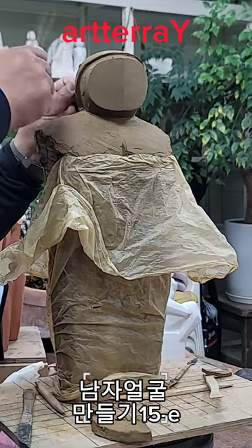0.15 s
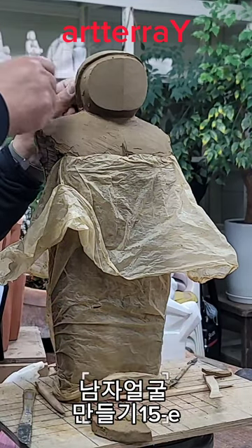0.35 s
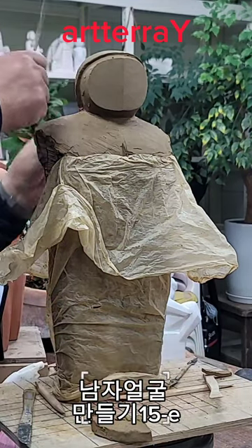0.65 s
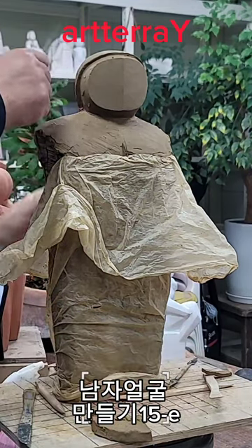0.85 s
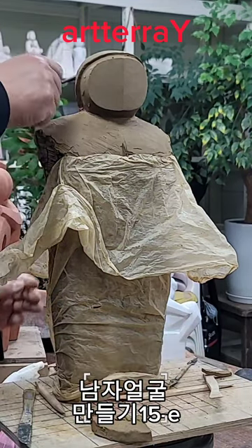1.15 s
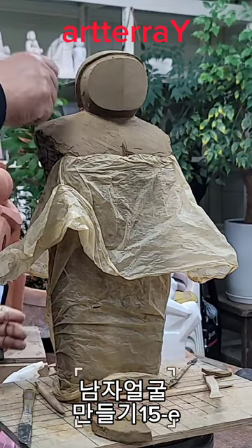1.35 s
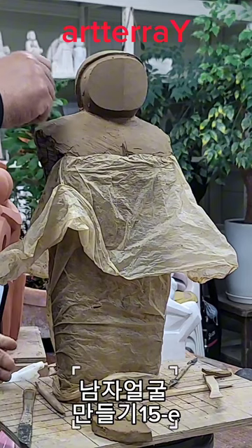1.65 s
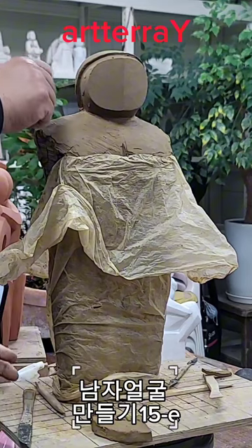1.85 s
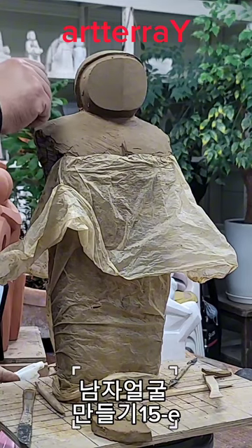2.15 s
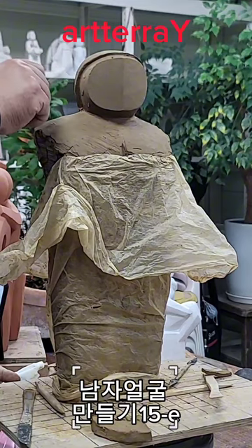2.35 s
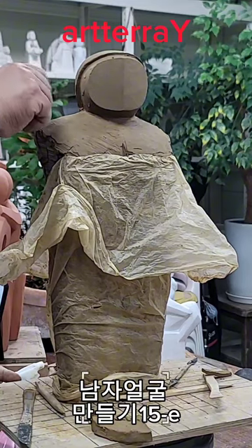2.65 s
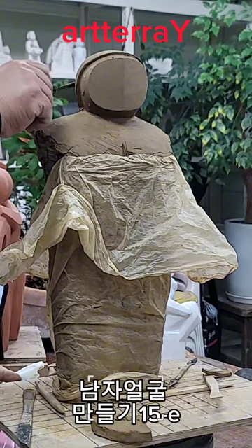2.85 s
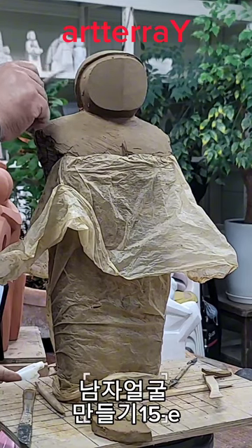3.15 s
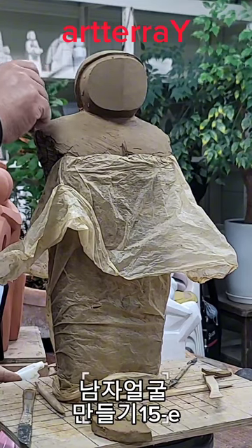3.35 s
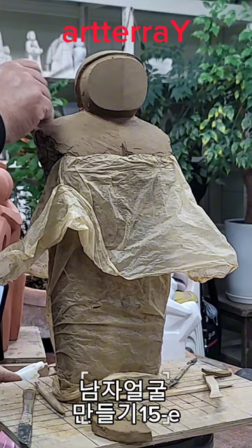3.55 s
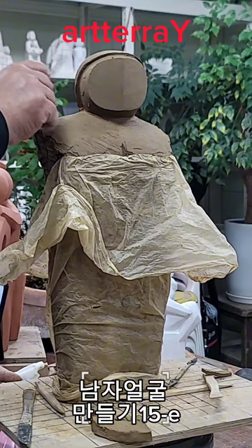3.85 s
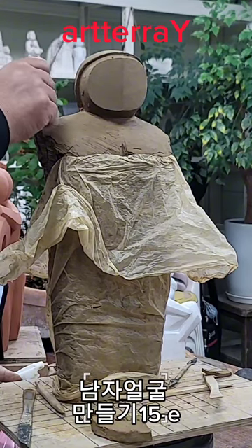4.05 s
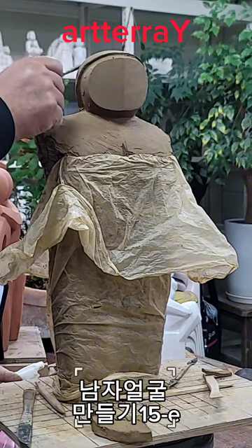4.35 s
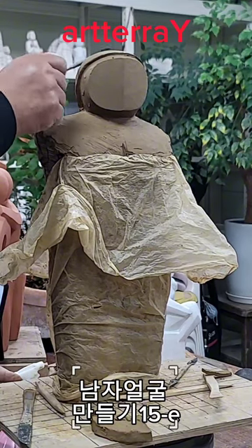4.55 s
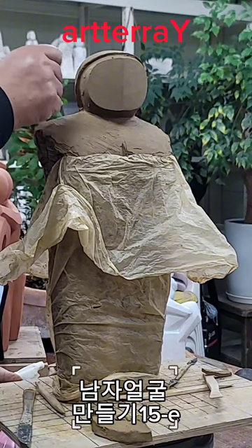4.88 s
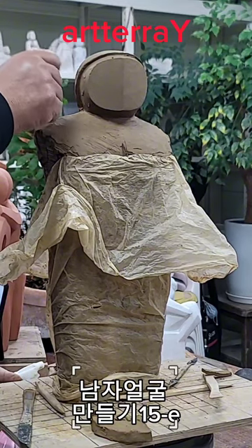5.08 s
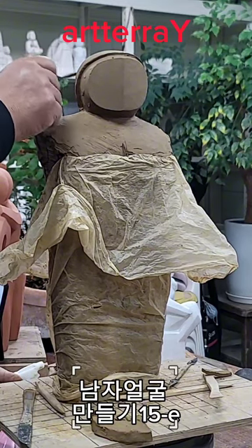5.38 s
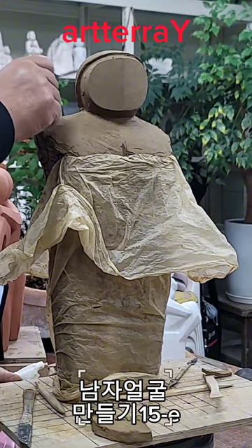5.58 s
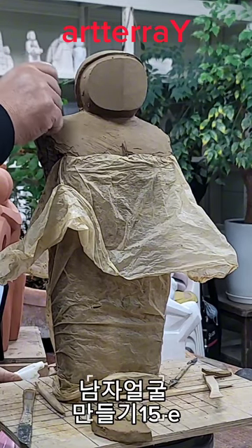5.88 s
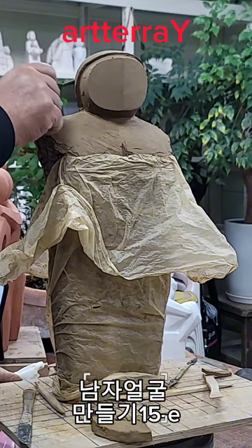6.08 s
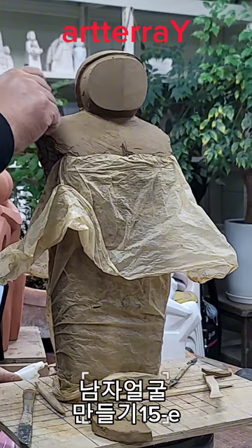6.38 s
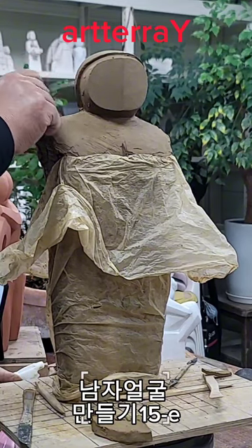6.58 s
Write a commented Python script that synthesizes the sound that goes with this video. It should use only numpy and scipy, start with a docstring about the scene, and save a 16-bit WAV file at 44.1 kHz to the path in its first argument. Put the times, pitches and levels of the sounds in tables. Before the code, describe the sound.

Rapid, even, muffled pats on a clay bust, joined midway by hollow wooden knocks, with faint plastic rustle in a quiet studio.

```python
"""A hand pats a damp clay bust about five times a second; each pat thuds through the bust and its stand.
Each thud is a train of short waves, then a ring of fading tones; the skin adds a noisy slap.
At times the wooden stand rocks and knocks on the table, often with a bounce: the table's tones ring.
The plastic wrap rustles (noise through its folds) and snaps, and a sleeve brushes at first (cloth noise).
A far drone, a band of noise, hangs over the quiet air of the studio."""
import sys
import numpy as np
from scipy import signal
from scipy.fft import rfft, irfft, next_fast_len
from scipy.io import wavfile
from scipy.ndimage import uniform_filter1d

SR = 44100
rng = np.random.default_rng(int(sys.argv[2]) if len(sys.argv) > 2 else 0)


def log_audio(samples):
    """Write samples as a 16-bit WAV file to the path given in sys.argv[1]."""
    # one column per channel
    frames = np.atleast_2d(samples).T
    # limit to full scale, then quantise
    limited = np.clip(frames, -1, 1)
    pcm = np.round(limited * 32767).astype(np.int16)
    wavfile.write(sys.argv[1], SR, pcm)


N = 296352  # length in samples

# All levels are relative: the functions add their own offsets.
# loudness of the far drone over time: t/s, level/dB
DRONE_LEVEL = [(0.0, -90), (0.3, -86.5), (1.23, -77), (1.7, -77), (2.4, -79), (2.75, -72), (3.6, -77),
               (5.3, -78), (5.89, -72), (6.34, -71), (6.72, -77)]
# colour of the drone: f/Hz, level/dB
DRONE_COLOUR = [(300, -0.5), (450, -31.5), (620, -8), (770, 0.5), (950, -15.5), (1200, -42)]
# colour of the still air: f/Hz, level/dB
AIR_COLOUR = [(30, 18.5), (80, 4.5), (200, -6.5), (500, -5), (1200, -13), (3000, -21.5), (8000, -21),
              (15000, -23.5)]
# sleeve strokes: t/s, level/dB, tightness (0-1), time to fall 20 dB/s
SLEEVE_STROKES = [(.09, -77, .7, .05), (.335, -68, .75, .03), (.565, -72, .55, .09), (.79, -65, .3, .12),
                  (.995, -69, .4, .35), (1.222, -65, .35, .1), (1.63, -68, .35, .18), (1.728, -72, 1, .05),
                  (1.828, -55, .92, .03), (2.052, -70, .45, .065), (2.455, -76, 1, .09),
                  (2.74, -78, 1, .12)]
# resonances of loose cloth: f/Hz, width/Hz, level/dB
SLACK_CLOTH = [(1040, 260, -4), (1740, 440, -5.5), (2490, 133, -4.5), (4000, 2100, -20)]
# resonances of tight cloth, passed through twice: f/Hz, width/Hz and level/dB of one pass
TIGHT_CLOTH = [(1450, 600, -2.5), (2530, 280, 0), (3270, 420, 1), (4230, 600, -4.5), (5260, 700, -4.5)]
# shakes of the wrap after a pat: t/s, level/dB, high fold level/dB, time to fall 20 dB/s (not the high fold)
WRAP_SHAKES = [(.0, -81, -92, .25), (.085, -79, -90, .11), (.33, -77, -89, .08), (.56, -77, -92, .5),
               (.79, -67, -75, .12), (.99, -71, -83, .3), (1.22, -69, -82, .1), (1.38, -79, -90, .9),
               (1.63, -71, -87, .15), (1.83, -64, -90, .1), (1.93, -79, -95, .3), (2.055, -75, -92, .09),
               (2.285, -79, -85, .09), (2.45, -75.5, -92, .15), (2.65, -74, -97, .4), (2.89, -67, -79, .1),
               (3.1, -68, -88, .13), (3.325, -68.5, -88, .08), (3.51, -73, -83, .22), (3.715, -79, -89, .1),
               (3.84, -88, -100, .5), (4.085, -86, -100, .2), (4.36, -81, -92, .08), (4.56, -81, -105, .15),
               (4.78, -67, -83, .1), (4.985, -66, -88, .09), (5.205, -68.5, -86, .08),
               (5.395, -74, -101, .1), (5.59, -79.5, -105, .12), (6.195, -83, -98, .15),
               (6.37, -82.5, -90, .15), (6.54, -78, -86, .17)]
# folds of the wrap: f/Hz, width/Hz, level/dB
WRAP_FOLDS = [(2830, 480, -1), (4050, 360, 4.5), (5133, 480, -1.5), (6100, 170, -2), (6670, 320, -5.5)]
# even rustle under the folds: f/Hz, level/dB
WRAP_RUSTLE = [(2000, -28.5), (3500, -12.5), (7000, -20.5), (8000, -20), (14000, -24)]
# one high fold, passed through twice: f/Hz, width/Hz and level/dB of one pass
HIGH_FOLD_MODE = [(9420, 880, 0)]
# creases that snap: t/s, level/dB
CREASE_SNAPS = [(0.3147, -71), (0.4778, -71), (0.9852, -65), (1.2015, -72), (1.38, -69), (2.06, -70),
                (3.5124, -68), (5.2051, -71), (6.1815, -61.5), (6.3623, -61.5)]
# tone of a snap, passed through twice: f/Hz, width/Hz and level/dB of one pass
SNAP_MODE = [(4800, 5000, 0)]
# the stand meets the table: t/s, level/dB, extra low sound from the weight/dB
STAND_KNOCKS = [(2.335, -69, 8), (2.4056, -62, 16.5), (2.6266, -40, 3.5), (2.6418, -55, -18),
                (2.6476, -40, 3), (2.8452, -40, 5.5), (2.8669, -33, 0), (2.9457, -57, 7.5),
                (3.0671, -30.5, 2), (3.0902, -30, -3), (3.274, -35, 2.5), (3.2952, -41, 2),
                (3.3304, -49.5, -16), (3.475, -46.5, 5), (3.4884, -44.5, 3), (3.679, -44.5, 5),
                (3.8781, -62.5, 15), (4.0441, -77, 21.5), (4.0878, -49, 9), (4.1984, -66, -17),
                (4.2998, -57.5, 12), (4.3661, -58, 14), (4.5212, -42, 3), (4.7351, -36, 3),
                (4.7568, -34.5, 0), (4.8891, -67.5, -7), (4.9531, -35.5, 0.5), (4.9749, -32, 0),
                (5.1643, -32.5, 0.5), (5.1857, -37, 2.5), (5.3745, -39, 4.5), (5.3883, -39, -1)]
# clear tones of the table: f/Hz, width/Hz, level/dB
TABLE_MODES = [(154.6, 17.6, 13), (307.7, 32.8, 3), (505.5, 15, -0.5), (633.3, 12.6, 4), (713, 11.2, -4.5),
               (849, 16.8, -2.5), (984, 17.7, 2), (1116, 54, -7), (1287, 13, -6), (1605, 38, -1.5),
               (2230, 56, -8.5), (2353, 13.3, -32.5), (2516, 43, -13.5), (2920, 100, -10.5),
               (3570, 110, -25), (4630, 74, -23), (5490, 130, -42)]
# colour of the table's dense clatter: f/Hz, level/dB
CLATTER_COLOUR = [(100, -7.5), (160, 1), (300, -5.5), (430, -12), (630, -7), (1000, -7.5), (1620, -11.5),
                  (1890, -17.5), (2800, -16.5), (3300, -24.5), (4600, -28), (6000, -55.5), (9000, -55.5)]
# typical time for the lingering clatter to fall 60 dB: f/Hz, time/s
CLATTER_DECAY = [(150, 0.34), (400, 0.42), (800, 0.22), (1500, 0.24), (2500, 0.17), (4000, 0.052),
                 (8000, .1)]
# pats, then lighter touches as the fingers settle:
# t/s, force level/dB, softness/dB per octave, neck level/dB, slap level/dB
HAND_PATS = [(.072, -44.5, 2, 5, -74.5), (0.317, -40, -1.5, 5.5, -65), (.547, -39.5, -3, 5, -63),
             (0.768, -39, -2.5, 5, -57), (0.983, -37.5, -3, 4, -60), (1.201, -39.5, -1, 3, -59),
             (1.408, -42.5, 0.5, 0, -66.5), (1.612, -40, -3.5, 6.5, -59.5), (1.821, -41, 3.5, 9.5, -67.5),
             (2.038, -40.5, -1.5, 4.5, -62), (2.243, -38, -3, -4, -61), (2.439, -39.5, -2, 0.5, -60),
             (2.644, -39, -4, -20, -64), (2.856, -29.5, -7, -28, -77), (3.064, -36, 2, -14, -60),
             (3.276, -35, 2, -14, -83), (3.494, -38, 2.5, 4.5, -56), (3.719, -37, 3.5, -3, -58),
             (3.945, -36, 3, 1, -64.5), (4.148, -37, -0.5, -2.5, -65.5), (4.352, -36.5, -4, -6, -54),
             (4.559, -37.5, -2, -5, -59.5), (4.757, -39, -3.5, -3, -74), (4.957, -35.5, -3.5, -10, -53.5),
             (5.154, -31.5, -3, -7, -85), (5.353, -36.5, 0.5, -4, -69), (5.546, -39, -2, 1.5, -63.5),
             (5.748, -38, -1.5, 2, -71.5), (5.94, -39, 0.5, 0, -72.5), (6.133, -39, -3, 0, -64.5),
             (6.327, -39.5, -1.5, 0.5, -66.5), (6.522, -38, -1.5, -1, -60.5), (1.305, -58, 4, 1, -86),
             (3.6, -57.5, 8, -3, -85), (3.79, -52, 0.5, -3, -77), (4.03, -53, 4, 11, -78),
             (4.23, -59.5, 1, -4, -83), (4.655, -56.5, 5, -8, -86), (5.67, -54, 2.5, 0.5, -81.5),
             (5.874, -59, 3.5, 0, -84.5), (6.051, -59, 4, -1.5, -84), (6.256, -58.5, 2.5, 3.5, -85)]
# waves of the thud, bending waves: f/Hz, arrival/s, spread/s
THUD_WAVES = [(175, .008, .005), (360, .021, .006), (280, .021, .008), (220, .021, .008), (155, .029, .006),
              (112, .0285, .0075), (80, .032, .0115)]
# strength of each of those waves: level/dB
THUD_LEVELS = [-4.5, -18.5, -6.5, -6, -11.5, 2.5, -4.5]
# tones that the bust and stand keep ringing with: f/Hz, level/dB, time to fall 60 dB/s
STAND_MODES = [(78.3, -9, 0.29), (111.4, -14, 0.5), (149.3, -16.5, 0.17), (166.5, -19.5, 0.48),
               (210.8, -18.5, 0.37), (243.1, -8.5, 0.21), (293, -21.5, 0.35), (303.3, -14.5, 0.2),
               (442, -27.5, .25)]
# colour of wet skin on clay: f/Hz, level/dB
SLAP_COLOUR = [(250, -12), (380, 2.5), (490, 1), (650, -2.5), (850, 0), (1080, -6.5), (1400, -16.5),
               (2500, -25), (5000, -39.5), (12000, -47)]
# typical time for the lingering slap to fall 60 dB: f/Hz, time/s
SLAP_DECAY = [(400, 0.56), (4000, 0.25)]
# air trapped under the fingers: f/Hz, level/dB
PALM_AIR = [(490, 5), (650, -1)]

SHAKE_RISE_S, SHAKE_HOLD_S = .035, .015  # time to climb 20 dB; time at the peak
HIGH_FALL_S = .045  # time for the high fold to fall 20 dB
STROKE_RISE_S, STROKE_HOLD_S = .027, .02  # time to climb 20 dB; time at the peak
DRAG_DB, DRAG_S = -19, .25  # the cloth drags on more faintly; time for that to fall 20 dB
TOP_HZ = 15530  # the microphone's band limit


def amp(db):
    """Turn decibels into a plain multiplier."""
    return 10 ** (np.asarray(db) / 20)


def unit(x):
    """Scale a signal to an average (rms) strength of 1."""
    return x / np.sqrt(np.mean(x ** 2) + 1e-20)


def along(points, hz):
    """Read a (f/Hz, value) curve, with pitch on a log axis."""
    f, v = np.transpose(points)
    return np.interp(np.log(hz + 1), np.log(f + 1), v)


def curve(rows):
    """Draw a (t/s, value) curve with one value per sample."""
    s, value = np.transpose(rows)
    return np.interp(np.arange(N) / SR, s, value)


def filtered(x, response):
    """Shape a sound by a complex response over frequency."""
    m = next_fast_len(len(x) + SR // 2)
    return irfft(rfft(x, m) * response(np.fft.rfftfreq(m, 1 / SR)), m)[:len(x)]


def modes(table):
    """Sum resonances with alternating signs; each rings only after it is struck."""
    def response(f):
        return sum((-1) ** k * amp(db) * 1j * f * width / (centre * centre - f * f + 1j * f * width)
                   for k, (centre, width, db) in enumerate(table))
    return response


def hiss(response, patchy_db, grain_db=0):
    """Coloured noise of rms 1, uneven in patches of time and pitch and in grains of 64 samples."""
    z = signal.stft(rng.standard_normal(N), nperseg=256)[2]
    field = uniform_filter1d(rng.standard_normal(z.shape), 4, 0)
    field = uniform_filter1d(field, 8, 1)
    patchy = signal.istft(z * amp(patchy_db * unit(field)), nperseg=256)[1][:N]
    grain_strength = np.repeat(rng.exponential(1, N // 64 + 1), 64)[:N]
    return unit(filtered(amp(grain_db * grain_strength) * patchy, response))


def bursts(times, gains, rise_s, hold_s, falls_s):
    """A gain for every sample: each event climbs to its peak, holds and falls away, evenly in dB."""
    t = np.arange(0, N / SR, .002) - np.asarray(times)[:, None]
    climb = -t / rise_s
    fall = np.maximum(t - hold_s, 0) / np.reshape(falls_s, (-1, 1))
    gain = gains @ amp(-20 * np.where(t < 0, climb, fall))
    return np.interp(np.arange(N) / SR, t[0] + times[0], gain)


def add(track, s, x):
    """Mix x into the track at time s."""
    track[round(s * SR):][:len(x)] += x


def crowd(low_hz, high_hz, decays, rise, linger_db, quick, count):
    """Dense modes that fall quickly, then linger weakly; lows swell slower, as bending waves go ~ root of pitch."""
    t = np.arange(SR // 4) / SR
    hz = np.geomspace(low_hz, high_hz, count) * amp(rng.normal(0, 0.105, count))
    t60 = along(decays, hz) * amp(rng.normal(0, 0.81, count))
    fall = -np.log(1000) * t / t60[:, None]
    waver = np.array([np.interp(t * 80, np.arange(len(k)), k) for k in rng.standard_normal((count, 32))])
    rise_s = rise * np.sqrt(1000 / hz)  # "rise" is the swell time at 1 kHz
    swell = 1 - np.exp(-(t / rise_s[:, None]) ** 2)
    fade_out = np.clip((t[-1] - t) / 0.019, 0, 1)
    shape = (np.exp(fall / quick) + amp(linger_db) * waver * np.exp(fall)) * swell * fade_out
    turn = 2 * np.pi * hz[:, None] * t
    return hz, np.vstack([shape * np.sin(turn), shape * np.cos(turn)])


def strike(rows, hz, db_per_hz):
    """Sound a crowd of modes at new random strengths, one blow for each row of levels."""
    gain = np.tile(amp(db_per_hz) * np.sqrt(hz), 2)  # modes stand further apart as pitch rises
    blows = gain * rng.standard_normal(gain.shape) @ rows
    return blows / np.linalg.norm(gain, axis=1, keepdims=True) * 2


def studio():
    """A far drone, noise in low bands that swells and sinks, over the steady noise of the room's air."""
    drone = hiss(lambda f: amp(along(DRONE_COLOUR, f)), patchy_db=-3.5)
    air = hiss(lambda f: amp(along(AIR_COLOUR, f)), patchy_db=2.8)
    return amp(curve(DRONE_LEVEL)) * drone + amp(-70.5) * air


def sleeve():
    """Cloth brushing cloth makes noise; pulled tight it sings in narrow bands."""
    s, db, tight, fall_s = np.transpose(SLEEVE_STROKES)
    turn = np.clip(tight, 0, 1) * np.pi / 2  # blends slack into taut at equal power
    slack = hiss(modes(SLACK_CLOTH), patchy_db=2.5, grain_db=1.5)
    taut = hiss(lambda f: modes(TIGHT_CLOTH)(f) ** 2, patchy_db=2.0, grain_db=2.0)

    def stroke(share):
        brush = bursts(s, amp(db) * share, STROKE_RISE_S, STROKE_HOLD_S, fall_s)
        drag = bursts(s, amp(db + DRAG_DB) * share, STROKE_RISE_S, STROKE_HOLD_S, DRAG_S)
        return brush + drag

    return stroke(np.cos(turn)) * slack + stroke(np.sin(turn)) * taut


def wrap():
    """The plastic crackles through its folds while it shakes; single creases snap."""
    s, db, high_db, fall_s = np.transpose(WRAP_SHAKES)
    folds = lambda f: modes(WRAP_FOLDS)(f) + amp(along(WRAP_RUSTLE, f))
    rustle = hiss(folds, patchy_db=3.0, grain_db=1.74)
    rustle = bursts(s, amp(db), SHAKE_RISE_S, SHAKE_HOLD_S, fall_s) * rustle
    high = hiss(lambda f: modes(HIGH_FOLD_MODE)(f) ** 2, patchy_db=3.5, grain_db=2.7)
    high = bursts(s, amp(high_db), SHAKE_RISE_S, SHAKE_HOLD_S, HIGH_FALL_S) * high
    clicks = np.zeros(N)
    for at, snap_db in CREASE_SNAPS:
        clicks[round(at * SR)] = amp(snap_db + 23.5)
    snaps = filtered(clicks, lambda f: modes(SNAP_MODE)(f) ** 2)
    return rustle + high + snaps


def knocks():
    """Each contact rings the table's clear modes and a dense clatter; heavy ones carry more low sound."""
    sharp, heavy, clatters = np.zeros(N), np.zeros(N), np.zeros(N + SR)
    hz, wood = crowd(100, 9000, CLATTER_DECAY, rise=0.0048, linger_db=-4.5, quick=0.34, count=220)
    lowness = np.clip(np.log2(1500 / hz), 0, 1)  # 0 above 1500 Hz, 1 an octave below
    colours = [along(CLATTER_COLOUR, hz) + (weight_db + 1.5) * lowness for _, _, weight_db in STAND_KNOCKS]
    for (s, db, weight_db), clatter in zip(STAND_KNOCKS, strike(wood, hz, colours)):
        sharp[round(s * SR)] = amp(db + 42)
        heavy[round(s * SR)] = amp(db + 40 + weight_db)
        add(clatters, s, amp(db - 3.5 + 1.15 * weight_db) * clatter)
    dull = lambda f: 1 / (1 + 1j * f / 1200) ** 2  # the weight pushes longer than the edge
    blows = sharp + filtered(heavy - sharp, dull)
    late = 0.00404  # seconds; each pitch is delayed by late * (sqrt(1000 / f) - 0.6), so treble leads
    spread = lambda f: np.exp(-4j * np.pi * late * (np.sqrt(1000 * f) - .3 * f))
    return clatters[:N] + filtered(blows, lambda f: modes(TABLE_MODES)(f) * spread(f))


def pats():
    """A soft push: wave packets pass, the stand rings on, the skin slaps."""
    out, t = np.zeros(N + SR), np.arange(SR // 3) / SR
    early = t[:SR // 16]
    skin_hz, skin = crowd(250, 12000, SLAP_DECAY, rise=0.018, linger_db=-9.5, quick=0.41, count=100)
    slaps = strike(skin, skin_hz, [along(SLAP_COLOUR, skin_hz)] * len(HAND_PATS))

    wave_hz, at, spread = np.transpose(THUD_WAVES)[:, :, None]
    packet = np.exp(-.5 * ((t - at) / spread) ** 2)
    soft_start = 1 - np.exp(-(t / 0.0045) ** 2)
    waves = -packet * np.cos(2 * np.pi * wave_hz * (t - at)) * soft_start

    hz, mode_db, t60 = np.transpose(STAND_MODES)[:, :, None]
    takeover = 1 - np.exp(-(t / .04) ** 3)  # the ring swells in as the waves pass
    rings = amp(mode_db - 60 * t / t60) * np.exp(2j * np.pi * hz * t) * takeover

    for (s, db, soft_db, neck_db, slap_db), slap in zip(HAND_PATS, slaps):
        def tilt(pitch):
            # a flatter hand favours the low modes; a pat near the neck wakes those around its bending pitch
            neck = np.exp(-(np.log2(pitch / 235) / 0.32) ** 2)
            return -soft_db * np.log2(pitch / 150) + neck_db * neck

        thud = amp(THUD_LEVELS + tilt(wave_hz[:, 0]) + rng.normal(0, 2.3, len(at))) @ waves

        phase = np.exp(2j * np.pi * rng.random(hz.shape))
        start = amp(tilt(hz) + rng.normal(0, 2.6, hz.shape)) * phase
        # each ring wavers at random, differently from pat to pat
        waver = [np.interp(t * 30, np.arange(12), k) for k in 1 + .7 * rng.standard_normal((len(hz), 12))]
        ring = np.sum((start * rings).imag * waver, axis=0)
        ring = ring * amp(3.5 + 0.3 * neck_db - 1.1 * soft_db)
        add(out, s, amp(db) * (ring + thud))

        touch = uniform_filter1d(rng.standard_normal(len(early)), size=6)
        add(out, s, amp(slap_db - 7.5 - 60 * early / .014) * touch)  # first touch, falls 60 dB in 14 ms

        pop = 0
        for pop_hz, pop_db in PALM_AIR:
            strength = amp(pop_db + rng.normal(0, 2))
            pitch = pop_hz * amp(rng.normal(0, 0.38))
            pop = pop + strength * np.sin(2 * np.pi * (pitch * early + rng.random()))
        puff = np.exp(-.5 * ((early - .02) / 0.0095) ** 2)
        add(out, s, amp(slap_db) * pop * puff)
        add(out, s, amp(slap_db + 4.5) * slap)
    return out[:N]


def scene():
    """All layers together, as one channel."""
    return (studio() + sleeve() + wrap() + knocks() + pats())[None]


def record(dry):
    """The small microphone drops the deep bass and keeps little above its band limit."""
    bass_cut = lambda f: (1j * f / (40 + 1j * f)) ** 3
    treble_cut = lambda f: np.where(f < TOP_HZ, 1, amp(-19))
    return filtered(dry[0], lambda f: bass_cut(f) * treble_cut(f))[None]


dry = scene()
out = record(dry)
log_audio(out)
```